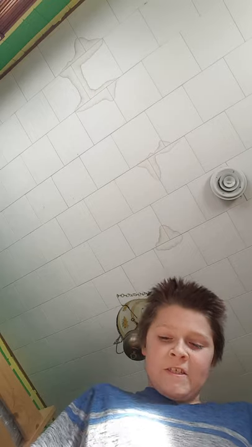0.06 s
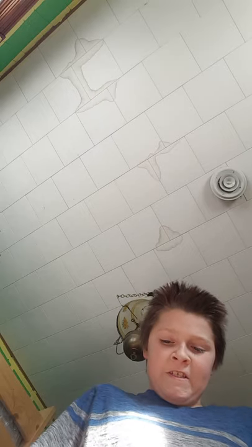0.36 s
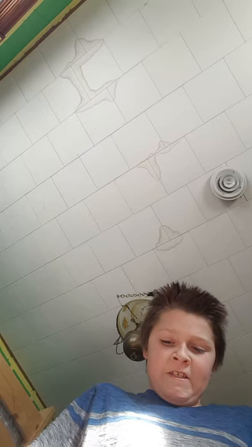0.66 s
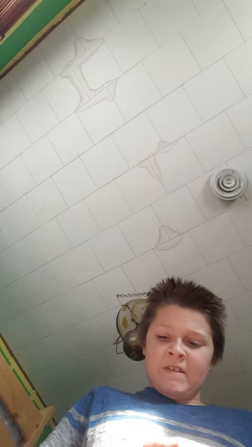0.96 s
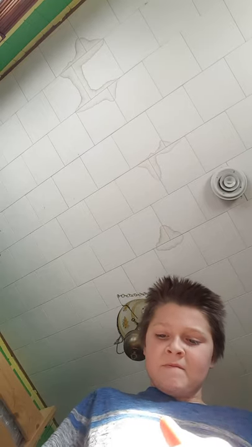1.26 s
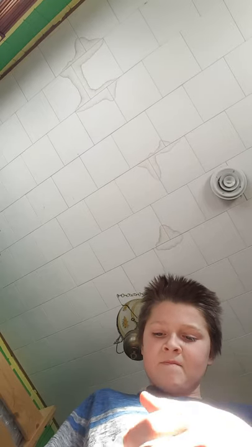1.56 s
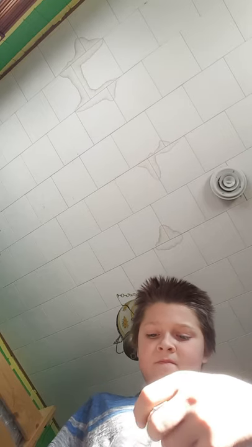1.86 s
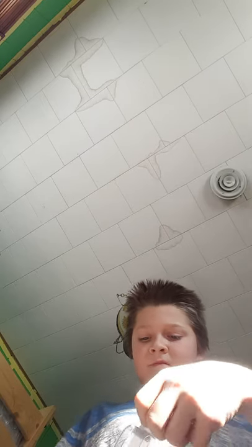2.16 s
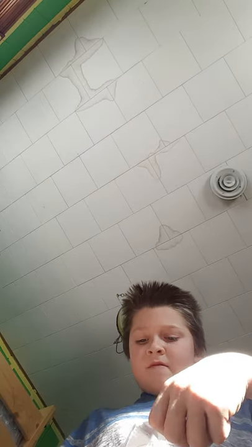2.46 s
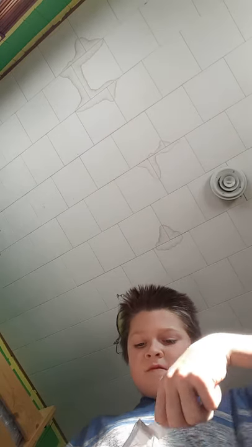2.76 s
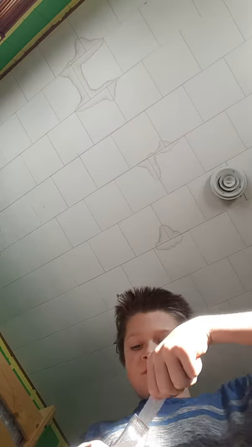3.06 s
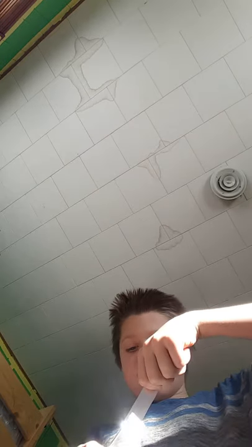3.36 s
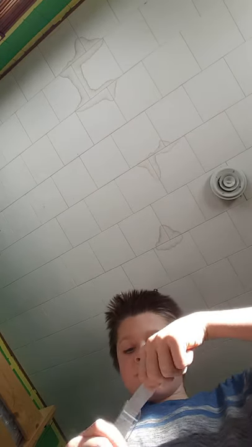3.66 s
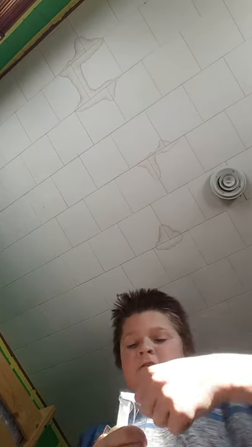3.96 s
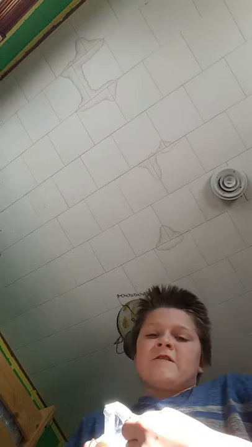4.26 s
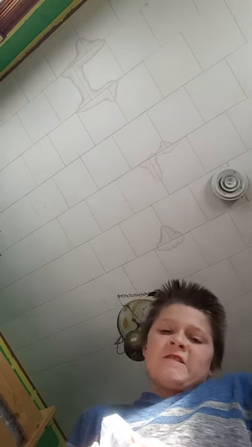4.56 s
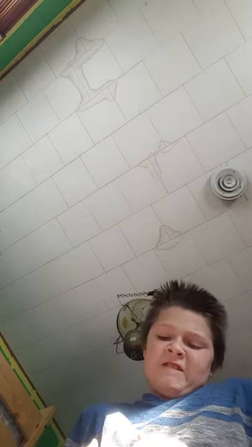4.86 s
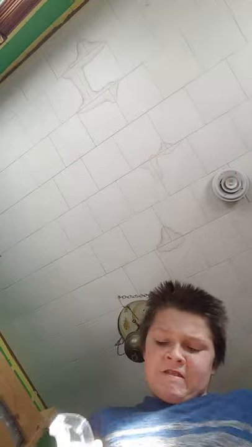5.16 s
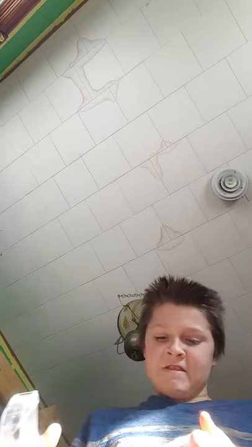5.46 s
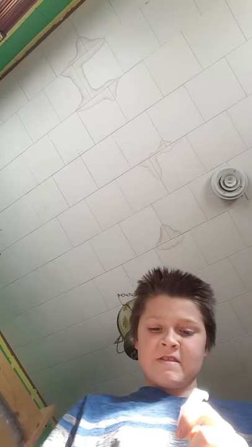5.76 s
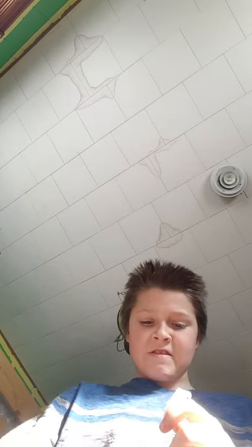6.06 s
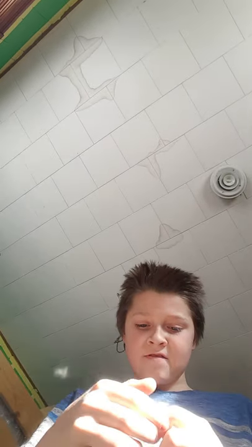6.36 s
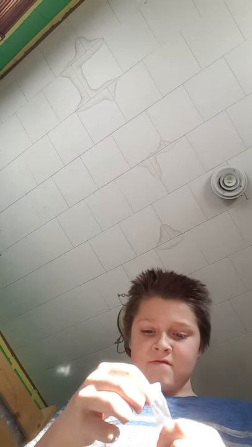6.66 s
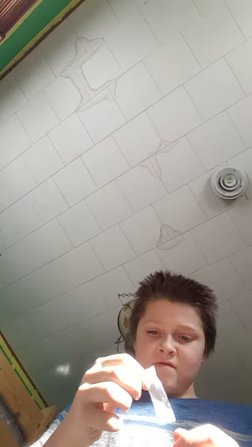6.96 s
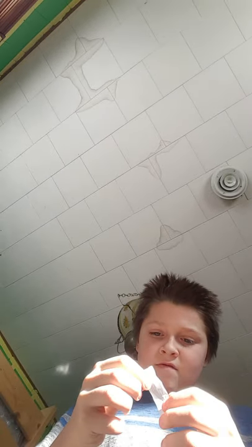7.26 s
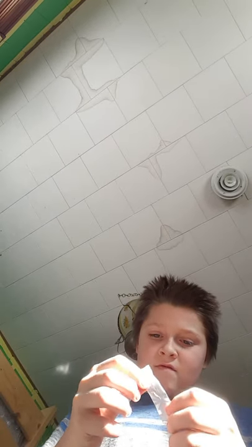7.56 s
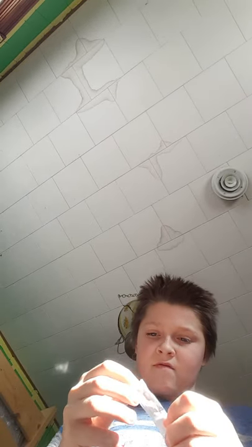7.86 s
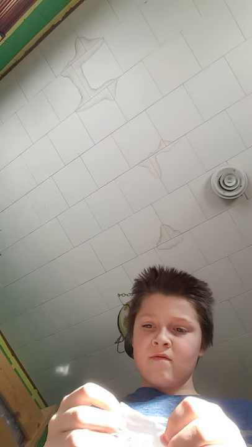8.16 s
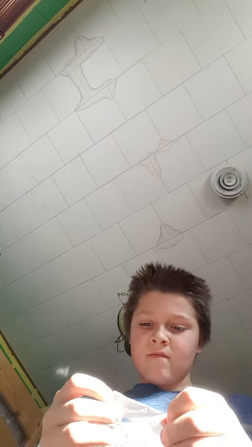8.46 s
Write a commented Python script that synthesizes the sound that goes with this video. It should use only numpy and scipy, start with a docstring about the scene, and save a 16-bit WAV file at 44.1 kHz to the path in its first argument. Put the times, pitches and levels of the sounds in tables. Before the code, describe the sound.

Sticky tape is picked at, peeled and torn off with a loud crack, then a plastic dispenser clacks in a quiet room.

```python
"""Clear sticky tape is handled close by in a small quiet room, over a faint hum. First a fingernail picks
at the roll; near 0.9 s the tape peels, its glue fizzing as it lets go and its film snapping. From about
2 s the strip is stretched, crackles and twangs, and at 5 s it tears off with a loud crack. Then the
plastic dispenser clacks as it is put aside. Last, fingers stick to and unstick from the loose strip."""
import sys
import numpy as np
from scipy import signal
from scipy.io import wavfile

SR = 44100
rng = np.random.default_rng(int(sys.argv[2]) if len(sys.argv) > 2 else 0)


def log_audio(samples):
    """Write samples as a 16-bit WAV file to the path given in sys.argv[1]."""
    # one column per channel
    frames = np.atleast_2d(samples).T
    # limit to full scale, then quantise
    limited = np.clip(frames, -1, 1)
    pcm = np.round(limited * 32767).astype(np.int16)
    wavfile.write(sys.argv[1], SR, pcm)


N = 379701
TIME = np.arange(N) / SR
LEAD_S = .008  # a snap gathers for this long before it breaks


def from_db(db):
    """Turn decibels into a number to multiply by."""
    return 10 ** (np.asarray(db) / 20)


def unit_energy(x):
    """Scale a short sound so that its squares add up to one, averaged over the channels."""
    return x / np.sqrt(np.mean(np.sum(x ** 2, axis=-1)) + 1e-30)


def unit_power(x):
    """Scale a long sound so that its squares average one."""
    return x / np.sqrt(np.mean(x ** 2) + 1e-30)


def at_hz(points, hz):
    """Read between the rows of a table, on a scale of octaves."""
    table = np.array(points)
    return np.interp(np.log(hz), np.log(table[:, 0]), table[:, 1])


def band(x, low_hz, high_hz, order=1):
    """Keep the sound between two frequencies."""
    edges = [low_hz, min(high_hz, .45 * SR)]
    return signal.sosfilt(signal.butter(order, edges, "band", fs=SR, output="sos"), x)


def resonance(x, hz, width_hz):
    """Make a sound ring around one pitch; a narrower width rings longer."""
    r = np.exp(-np.pi * width_hz / SR)
    return signal.lfilter([1, 0, -1], [1, -2 * r * np.cos(2 * np.pi * hz / SR), r * r], x)


def ring(clicks, hz, fade_s):
    """Each click starts a pure tone that fades by 60 dB in fade_s."""
    r, w = from_db(-60 / (fade_s * SR)), 2 * np.pi * hz / SR
    return signal.lfilter([0, np.sin(w)], [1, -2 * r * np.cos(w), r * r], clicks + 1e-18)


def drift(per_s):
    """A wandering curve that heads for a new random value per_s times a second."""
    targets = rng.standard_normal(4000)
    return unit_power(np.interp(TIME * per_s, np.arange(len(targets)), targets))


def half_octaves():
    """Bands from bass to treble: (low edge [Hz], centre [Hz], high edge [Hz])."""
    edges = np.geomspace(22, 17500, 20)
    return zip(edges, np.sqrt(edges[1:] * edges[:-1]), edges[1:])


def add(out, s, sound):
    """Mix a short sound in, starting at s seconds."""
    start = int(round(s * SR))
    out[:, start:start + sound.shape[-1]] += sound[:, :N - start]


def gestures(rows, swell_s, fade_s):
    """Loudness of a run of hand actions: each swells, holds for its length and dies away."""
    power = 1e-12
    for start, length, db in rows:
        outside = np.maximum(start - TIME, 0) / swell_s + np.maximum(TIME - start - length, 0) / fade_s
        power = power + (from_db(db) * np.exp(-np.minimum(outside, 20))) ** 2
    return np.sqrt(power)


# how alike far sound is on the left and right: (frequency [Hz], likeness [-1 opposite to 1 same])
LIKENESS = [(60, -0.61), (130, 0.22), (300, 0.11), (640, 0.18), (1400, 0.28), (3000, -0.23), (15000, 0.35)]
def surrounding_noise(colour, size, fades=None):
    """Noise arriving from all sides; given a table of fade times, each band dies away."""
    white, out = rng.standard_normal((2, 2, size)), 0
    for k, (low, hz, high) in enumerate(half_octaves()):
        mid, side = band(white[k % 2], low, high, order=2)
        alike = at_hz(LIKENESS, hz)
        stereo = np.sqrt(1 + alike) * mid + np.sqrt(1 - alike) * side * [[1], [-1]]
        fade = 1 if fades is None else from_db(-60 * TIME[:size] / at_hz(fades, hz))
        out = out + from_db(at_hz(colour, hz)) * fade * stereo
    return out


# tone colour of the room's air: (frequency [Hz], relative level [dB])
AIR_COLOUR = [(25, -9), (50, 0), (100, -0.5), (200, -1.5), (400, -5.5), (1000, -12), (2500, -15),
              (5000, -20.5), (10000, -27), (14000, -25)]
def air_and_hum(air_db=-68.5, hum_hz=119.7, hum_db=-78):
    """Still room air and the slightly wavering hum of an appliance."""
    hum = np.sqrt(2) * np.sin(2 * np.pi * np.cumsum(hum_hz + 1.5 * drift(5.3)) / SR)
    air = unit_power(surrounding_noise(AIR_COLOUR, N))
    return from_db(air_db) * air + from_db(hum_db + 1.1 * drift(6.2)) * hum


# pulls that peel the glue: (start [s], length [s], level [dB])
PULLS = [(0.02, 0.63, -72), (0.84, 0.13, -56.5), (2.22, 0.25, -71.5), (2.62, 0.48, -74), (2.9, 0.032, -58),
         (3.14, 0.13, -59), (4.56, 0.03, -68.5), (4.7, 0.026, -74), (4.96, .05, -64.5), (5.02, 0.097, -51),
         (5.33, 0.11, -75), (6.5, .16, -73.5), (6.78, .06, -67), (7.7, .11, -74.5), (8.265, 0.016, -66.5)]
def pulling():
    """How hard the fingers pull on the tape at each moment."""
    return gestures(PULLS, swell_s=.025, fade_s=.035)


# how the roll's skin rings under the fingernail: (pitch [Hz], width [Hz], relative level [dB])
ROLL_RINGS = [(2920, 1200, -1), (6530, 660, -1), (9700, 1100, -3), (13200, 1500, -3)]
# tone colour of glue leaving the free film: (frequency [Hz], relative level [dB])
PEEL_COLOUR = [(300, -18.5), (1200, -9.5), (3400, 0), (5000, -1), (8500, -2.5), (11000, -6), (15000, 3.5)]
def peeling(pull, threads_per_s=1500, spread_db=4.5, stutter_db=6.0, picking_ends_s=.7):
    """Threads of glue let go at random, in stutters, and tick on the roll, later on the free film."""
    breaks = rng.random((2, N)) < threads_per_s / SR
    strength = from_db(spread_db * np.minimum(rng.exponential(1, (2, N)), 4))
    ticks = breaks * strength * rng.choice([-1, 1], (2, N))
    ticks = ticks + ticks[::-1] * rng.standard_normal((2, N)) + 1e-18  # each tick reaches both sides
    on_film = sum((-1) ** k * from_db(at_hz(PEEL_COLOUR, hz)) * band(ticks, low, high, order=2)
                  for k, (low, hz, high) in enumerate(half_octaves()) if hz > PEEL_COLOUR[0][0])
    # the taut strip sizzles around one bright pitch
    on_film = unit_power(on_film) + from_db(-4.5) * unit_power(resonance(ticks, 8500, 1400))
    on_roll = sum(from_db(db) * unit_power(resonance(ticks, hz, width)) for hz, width, db in ROLL_RINGS)
    fizz = np.where(TIME < picking_ends_s, unit_power(on_roll), unit_power(on_film))
    stutter = unit_power(from_db(stutter_db * drift(71)))
    return pull * stutter * fizz


def snap(fall_ms, ring_hz, flap_db, body_db, ring_db, crack_db, ring_width=.22, apart=1.0):
    """A few slips grow into a rush that shakes the plastic: it flaps, a crease rings, the edge cracks."""
    size = 1500
    shared, left, right, roughness = rng.standard_normal((4, size))
    ms = (TIME[:size] - LEAD_S) * 1000  # zero at the break
    gathering = np.exp(-abs(ms) / .26) + from_db(-28) * np.exp(-abs(ms) / 4)
    dying = np.exp(-abs(ms) / fall_ms)
    slips = np.where(ms < 0, gathering, dying) * from_db(-1.5 * roughness)
    # high sounds leave the crumpled film differently towards each side
    stereo = (shared + apart * np.array([left, right])) * slips
    # the whole piece also feels one jerk as the tension drops
    shake = unit_energy(shared * slips) + .51 * signal.unit_impulse(size, int(LEAD_S * SR))
    flap = unit_energy(resonance(shake, 450, 440)) + from_db(-10) * unit_energy(band(shake, 50, 260))
    body = unit_energy(band(resonance(shake, 2200, 660), 350, 9100))
    crease = unit_energy(resonance(stereo, ring_hz, ring_hz * ring_width))
    crack = unit_energy(band(stereo, 4000, 12000))
    return (from_db(flap_db) * flap - from_db(body_db) * body
            + from_db(ring_db) * crease + from_db(crack_db) * crack)


def film_snap(fall_ms, ring_hz, db, weight_db):
    """One snap of the tape; the weight says how much of the strip moves with it."""
    # a low crease is a broad one and rings more weakly
    crease_db = -3 + .7 * np.log2(ring_hz / 5000)
    return snap(fall_ms, ring_hz, flap_db=db + weight_db - 6, body_db=db + weight_db - .5,
                ring_db=db + crease_db, crack_db=db - 4)


def crinkles(pull, per_s=9, above_pull_db=23.5, spread_db=2.0, pitch_range_hz=(2500, 8000)):
    """Faint snaps at random moments, louder the harder the tape is pulled."""
    out, draws = np.zeros((2, N)), rng.random(size=(200, 3))
    for when, pitch, softness in draws[:int(per_s * N / SR)]:
        s = LEAD_S + when * (N / SR - 2 * LEAD_S)
        db = 20 * np.log10(pull[int(s * SR)]) + above_pull_db - spread_db * (2 * softness - 1)
        hz = np.interp(pitch, [0, 1], pitch_range_hz)
        add(out, s - LEAD_S, film_snap(fall_ms=1.2, ring_hz=hz, db=db, weight_db=-2))
    return out


# moves of hand and sleeve: (start [s], length [s], level [dB])
HAND_MOVES = [(0.15, 0.5, -71.5), (0.82, 0.27, -69.5), (1.33, 0.45, -69), (2.25, 0.044, -67.5),
              (2.66, 0.084, -67), (2.89, 0.055, -63.5), (3.12, 0.077, -66), (3.27, 0.01, -56.5),
              (3.52, .15, -74.5), (4.22, 0.077, -65), (4.42, 0.57, -72), (5.17, .22, -59),
              (5.48, 0.38, -68), (6.0, 0.148, -61.5), (6.16, .07, -58), (6.27, .05, -69),
              (6.51, 0.045, -62.5), (6.79, .06, -67), (7.72, 0.3, -69.5), (8.265, .035, -66)]
# tone colour of their rubbing: (frequency [Hz], relative level [dB])
RUB_COLOUR = [(40, -9.5), (110, 1.5), (350, 0), (700, -4.5), (1500, -11), (3000, -12.5), (6000, -24.5),
              (15000, -32.5)]
def rubbing(uneven_db=2.5):
    """Skin and sleeve slide with an uneven soft hiss."""
    movement = gestures(HAND_MOVES, swell_s=.018, fade_s=.06)
    flicker = from_db(uneven_db * drift(39))
    return movement * unit_power(flicker * surrounding_noise(RUB_COLOUR, N))


# the tape's clearest snaps: (time [s], fall time [ms], pitch [Hz], level [dB], weight [dB])
TAPE_SNAPS = [(0.152, 3.7, 2920, -34, -9), (0.308, 4.4, 2200, -26.5, -11),
              (0.6153, 1.6, 2840, -20.5, -10.5), (0.8392, 0.8, 6200, -11, -0.5),
              (0.8714, 0.56, 9300, -24.5, -5), (0.8735, 0.57, 3440, -15.5, -22),
              (0.904, 1.1, 4590, -29.5, -3.5), (0.9149, 0.59, 3300, -10, -6), (0.926, 1.84, 7400, -8, -4.5),
              (0.9582, .9, 2410, -17, -15), (0.99, 0.39, 8970, -11, -22.5), (1.0821, 3.4, 6000, -24, -3),
              (2.2822, 0.55, 4810, -33.5, -2), (2.3406, 1.8, 3970, -33.5, 0), (2.6565, 1.1, 3420, -36, -14),
              (2.776, .85, 3000, -30.5, -8), (2.9179, 4, 6860, -28, 4), (2.9242, .8, 2640, -31, 1),
              (2.9456, .7, 7970, -25.5, -2), (2.9535, 1.3, 3560, -23, 5), (2.9575, 6.9, 6950, -18, -2),
              (2.9688, 4.1, 2640, -30, 5), (2.9826, 1.4, 7400, -26, -7), (3.1201, 3.4, 7270, -38.5, 4),
              (3.1523, 2, 8000, -30, 6), (3.1811, 3.6, 3500, -24.5, -4.5), (3.2579, 2.6, 11000, -36, 12.5),
              (3.2801, 1.2, 6900, -16.5, 3.5), (3.2827, 3.4, 3140, -20, -6), (3.2894, 4.1, 2640, -31.5, 14),
              (3.6817, 0.49, 7270, -35.5, -1.5), (3.7917, 2.2, 3820, -34.5, 3),
              (3.8121, 1.4, 3180, -25.5, -2), (3.8824, 0.91, 5100, -37.5, -5),
              (5.018, 1.4, 3900, -9.5, -17), (5.0445, 0.64, 6000, -5, -16.5), (5.0511, 1.07, 8350, 4, 1),
              (5.0525, 1.5, 11000, -9, 5), (5.0581, 2.7, 3200, 3, -1.5), (5.0622, 8.6, 4960, -3, -4),
              (5.1677, 1.6, 4900, -29.5, 7), (5.282, 1.3, 4390, -36.5, -2), (5.431, 1, 5500, -39.5, -12),
              (6.1654, 2.8, 6630, -35.5, 6), (6.5109, 1.2, 10900, -40, 7.5), (6.6155, 3.8, 6000, -34, 0.5),
              (6.6703, 1.24, 7000, -39.5, 3), (6.8007, 2.5, 6120, -32.5, 8.5), (6.805, .95, 6900, -23, -3),
              (6.832, 2.3, 6020, -21.5, -4.5), (6.8359, 2.6, 3440, -26, -0.5),
              (7.0829, 1.3, 5280, -35.5, 6.5), (7.149, 2.9, 6230, -34.5, 5.5),
              (7.6429, 3.3, 3170, -34.5, 1), (7.7856, 1.1, 3140, -32, 5), (8.0469, .63, 7610, -31, 3.5),
              (8.5217, 1.1, 1543, -29, 0)]
def tape_snaps():
    """The film snaps as it is handled; the loudest cluster is the tear."""
    out = np.zeros((2, N))
    for s, fall_ms, hz, db, weight_db in TAPE_SNAPS:
        add(out, s - LEAD_S, film_snap(fall_ms, hz, db, weight_db))
    return out


# soft bumps of fingers and hand: (time [s], pitch [Hz], level [dB])
HAND_BUMPS = [(0.589, 600, -39.5), (0.674, 450, -42), (1.3, 447, -36), (1.361, 550, -34.5),
              (2.047, 600, -43), (3.617, 636, -38.5), (5.774, 270, -27), (6.055, 140, -30),
              (6.138, 140, -42), (6.165, 140, -31.5), (6.285, 140, -35), (7.97, 420, -39)]
def hand_bumps(fall_s=.0061):
    """Soft flesh gives only a dull thud, deeper for the whole hand than for a fingertip."""
    out, fall = np.zeros((2, N)), np.exp(-TIME[:SR // 10] / fall_s)
    for s, hz, db in HAND_BUMPS:
        burst = rng.standard_normal((1, len(fall))) * fall
        thud = band(burst, hz / 1.6, hz * 1.6, order=2)
        add(out, s, from_db(db) * unit_energy(thud))
    return out


# twangs of the strip: (time [s], pitch [Hz], level [dB], time to fade by 60 dB [s])
STRIP_TWANGS = [(2.9894, 810, -41, 0.022), (3.289, 327, -42, 0.094), (5.053, 560, -28.5, .05),
                (6.833, 496, -37.5, 0.018)]
def strip_twangs():
    """The stretched strip gives a short low note as it goes slack."""
    out, pluck = np.zeros((2, N)), signal.unit_impulse((1, SR // 2), (0, 0))
    for s, hz, db, fade_s in STRIP_TWANGS:
        add(out, s, from_db(db) * ring(pluck, hz, fade_s))
    return out


# clacks of the dispenser: (time [s], fall time [ms], pitch [Hz], level [dB], weight of the knock [dB])
CLACKS = [(5.535, 1.9, 3040, -20, -7), (5.578, 1.1, 5860, -45, 8), (5.7163, 2.3, 3330, -13, -17),
          (5.744, 3.2, 3600, -30, 0), (5.7739, 2.8, 3720, -7.5, -7), (6.1793, 4.6, 4000, -22, 0),
          (6.2274, 6.7, 4040, -33.5, -6), (6.2674, 4.6, 3500, -40.5, -8)]
# notes of its shell: (pitch [Hz], relative level [dB], time to fade by 60 dB [s])
SHELL_NOTES = [(1380, 0, 0.07), (2240, 14.5, 0.064), (3880, -5, .085), (4120, 2, 0.076), (4670, -7, 0.092),
               (4900, -1, 0.1)]
def dispenser():
    """Hard plastic knocks as it is put aside; each knock leaves the shell ringing faintly."""
    out, blows = np.zeros((2, N)), np.zeros(N)
    for s, fall_ms, hz, db, weight_db in CLACKS:
        clack = snap(fall_ms, hz, flap_db=db + weight_db - 18.5, body_db=db + weight_db,
                     ring_db=db, crack_db=db - 23, ring_width=.19, apart=.45)
        add(out, s - LEAD_S, clack)
        blows[int(s * SR)] = from_db(db)
    shell = sum(from_db(db) * ring(blows, hz, fade_s) for hz, db, fade_s in SHELL_NOTES)
    return out + from_db(-29) * shell / len(SHELL_NOTES)


# tone colour of the room's echo: (frequency [Hz], relative level [dB])
ECHO_COLOUR = [(60, -3), (250, -3), (600, -6.5), (1400, -4.5), (3400, -1), (6000, 0.5), (9000, -0.5),
               (15000, -7)]
# how long the echo lasts: (frequency [Hz], time to fade by 60 dB [s])
ECHO_FADES = [(100, 0.18), (500, 0.21), (1500, 0.19), (4000, .22), (9000, 0.096), (15000, .19)]
def room_echo(x, tail_db=-17.5, ceiling_s=.012, ceiling_db=-21.5, early_db=-9.5):
    """Sound bounces back: weak early scatter, the echo off the ceiling, then a short tail."""
    size = SR // 2
    build_up_db = np.interp(TIME[:size], [0, .003, ceiling_s - .002, ceiling_s + .001],
                            [-60, early_db, early_db, 0])
    tail = unit_energy(surrounding_noise(ECHO_COLOUR, size, ECHO_FADES) * from_db(build_up_db))
    bounce = band(rng.standard_normal((2, size)) * np.exp(-TIME[:size] / .0012), 300, 9000)
    ceiling = np.roll(unit_energy(bounce), int(ceiling_s * SR), axis=-1)
    response = from_db(tail_db) * tail + from_db(ceiling_db) * ceiling
    return signal.fftconvolve(x[1:], response, axes=-1)[:, :N]


def microphones(x, right_db=2.87, bass_loss=.3, dip_hz=10500, dip_depth=.99, lag_s=.00021):
    """The hands are nearer the right side; the left hears them later, thinner and with a treble dip."""
    bass = band(x[0], 40, 1200)
    treble = band(x[0], dip_hz / np.sqrt(2), dip_hz * np.sqrt(2))
    left = x[0] - bass_loss * bass - dip_depth * treble
    late_left = np.pad(left, (int(round(lag_s * SR)), 0))[:N]
    return np.array([late_left, from_db(right_db) * x[1]])


def scene(tear_s=5.05, tear_echo_db=5.5, clack_echo_db=-4.0):
    """Mix the close tape, hands and dispenser with the room's echo and background."""
    pull = pulling()
    around = air_and_hum() + rubbing()
    thuds = hand_bumps()
    tape = peeling(pull) + tape_snaps() + strip_twangs()
    clacks = dispenser()
    # the fingers shield small snaps; the tearing strip flies free and fills the room
    tear_boost = from_db(tear_echo_db * (abs(TIME - tear_s) < .03))
    echoes = room_echo(tape * tear_boost + from_db(clack_echo_db) * clacks)
    return microphones(tape + clacks + thuds + crinkles(pull)) + echoes + around


def record(dry):
    """Round off the tallest peaks and cut the very highest treble."""
    peak_limit, cutoff_hz = .9, 16200
    rounded = peak_limit * np.tanh(dry / peak_limit)
    return signal.sosfilt(signal.ellip(10, .1, 80, cutoff_hz, fs=SR, output="sos"), rounded)


dry = scene()
out = record(dry)
log_audio(out)
```